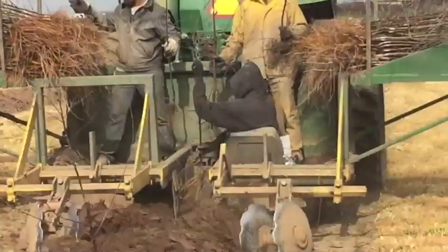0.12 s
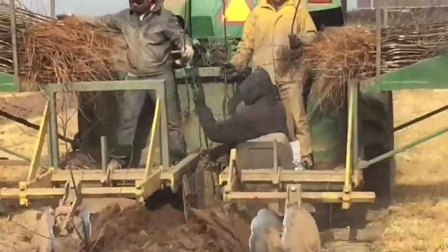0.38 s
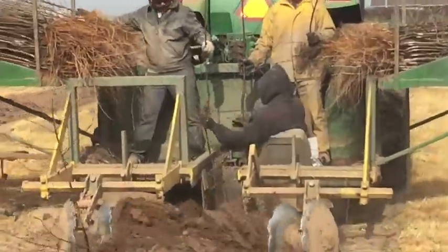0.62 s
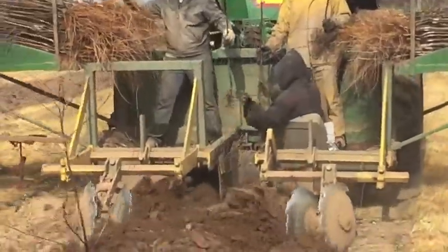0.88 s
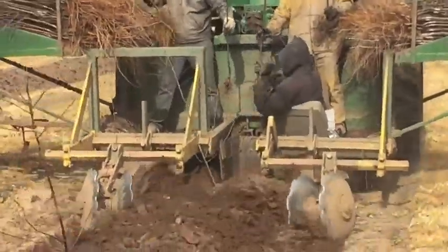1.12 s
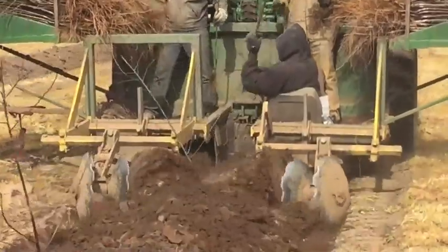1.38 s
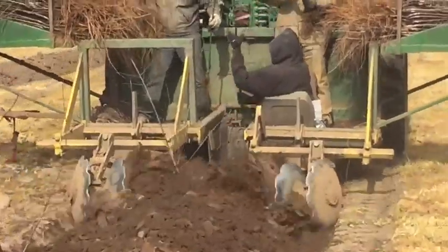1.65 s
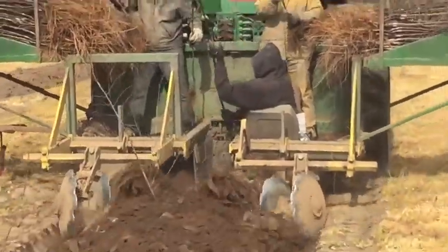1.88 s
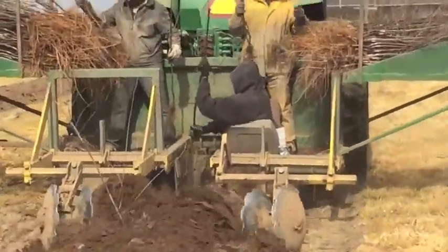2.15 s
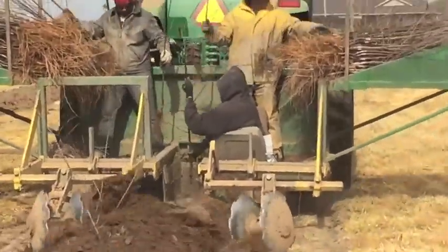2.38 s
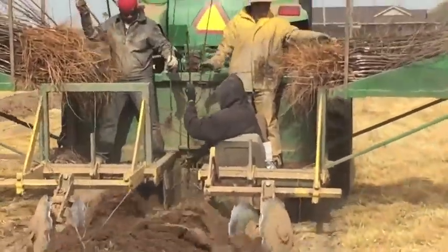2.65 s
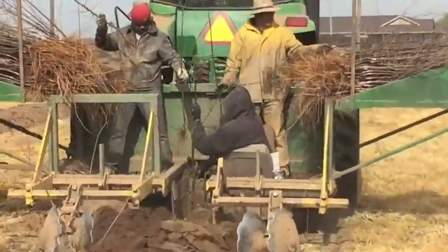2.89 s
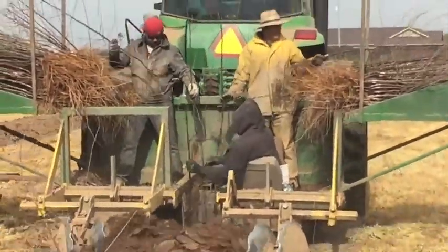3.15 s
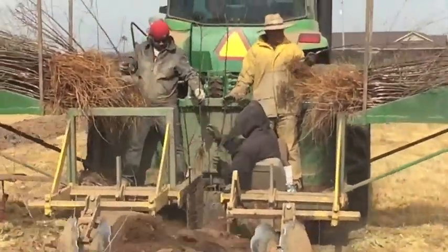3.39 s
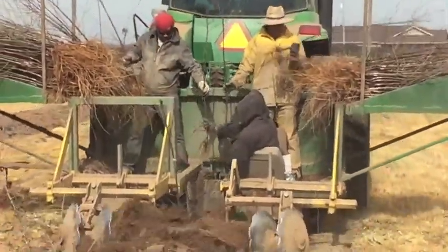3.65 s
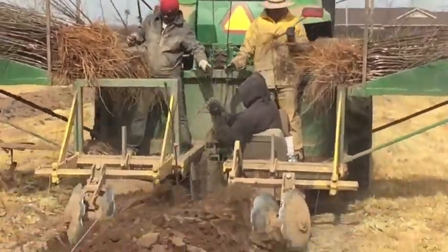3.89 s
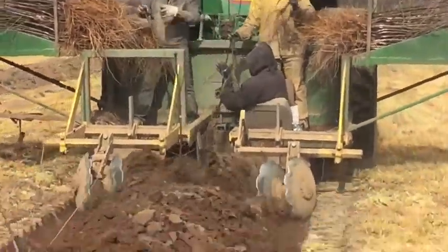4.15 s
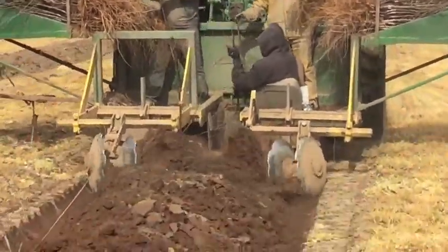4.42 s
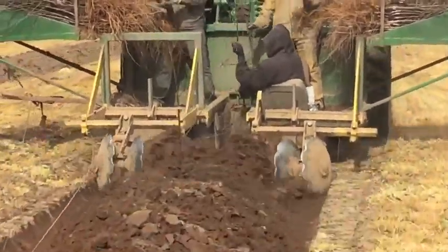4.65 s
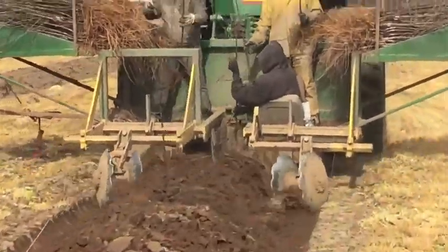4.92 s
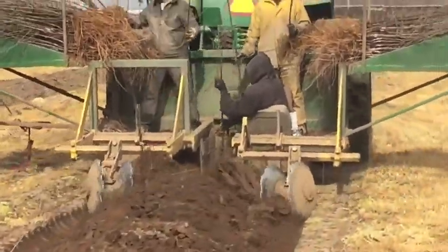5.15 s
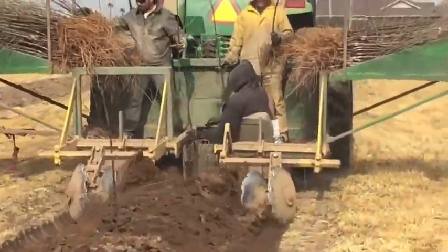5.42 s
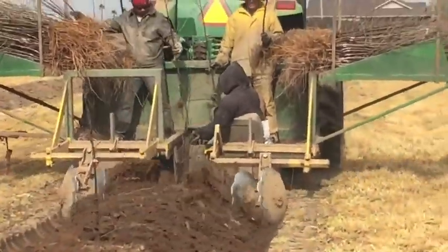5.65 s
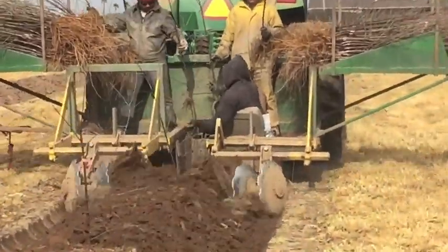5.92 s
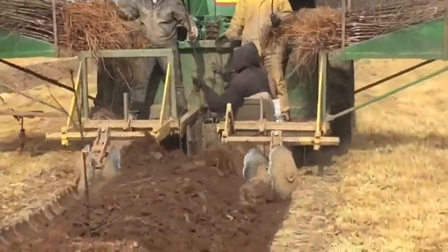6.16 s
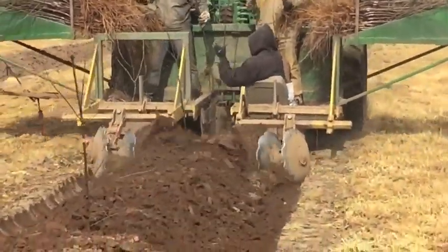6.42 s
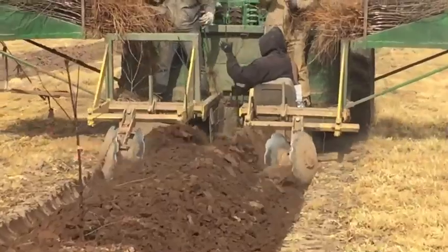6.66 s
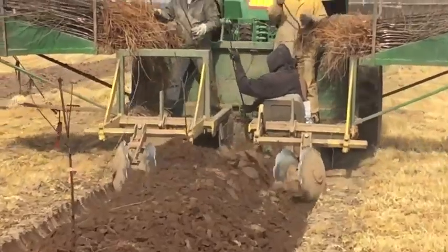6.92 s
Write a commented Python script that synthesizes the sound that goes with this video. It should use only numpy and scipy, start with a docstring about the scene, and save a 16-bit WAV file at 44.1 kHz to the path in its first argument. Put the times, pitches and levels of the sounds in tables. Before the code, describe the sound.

A large diesel tractor drones steadily outdoors, a second hum beating against it, with wind buffeting the microphone and loose steel jingling faintly.

```python
"""A six-cylinder diesel tractor hauls a planter across a field in a light wind: steady tones locked to
the firing, over a roar of coloured noise. A second, steadier hum of sine tones beats against them.
Loose steel jingles on the frame as decaying modes, and roots rustle in soft swells of hiss.
Low noise swells in gusts that buffet the microphone, with short sinking pops of air and a steady rumble."""
import sys
import numpy as np
from scipy import signal
from scipy.fft import rfft, irfft, next_fast_len
from scipy.io import wavfile
from scipy.ndimage import uniform_filter1d, map_coordinates

SR = 44100
rng = np.random.default_rng(int(sys.argv[2]) if len(sys.argv) > 2 else 0)


def to_linear_factor(level_db):
    """Convert decibel levels (scalar or array-like) to linear amplitude factors."""
    exponent = np.asarray(level_db, float) / 20
    return 10 ** exponent


def bounce(signal):
    """Save signal as a 16-bit WAV file at the path given by the first command-line argument."""
    frames = np.transpose(np.atleast_2d(signal))
    limited = np.clip(frames, -1, 1)
    pcm = np.round(limited * 32767).astype(np.int16)
    wavfile.write(sys.argv[1], SR, pcm)


N = 310905  # length [samples]

# engine speed: (time [s], firing rate [Hz])
FIRING_RATE = [(0, 105.6), (0.5, 106.4), (0.9, 105.6), (1.5, 106.7), (2.0, 105.9), (2.6, 105.9), (2.9, 104),
               (3.2, 104.4), (3.5, 102.5), (3.8, 104.1), (4.4, 104.1), (5.0, 102.9), (5.3, 103.2),
               (5.9, 103.3), (6.3, 104.8), (6.8, 104), (7.05, 102.9)]
# colour of dry scraping and rustling: (frequency [Hz], relative density [dB per Hz])
DRY_SCRAPE = [(3000, -20), (6000, -5), (10500, -5), (13000, -4), (15700, -16)]


def unit(x):
    """Scaled to rms 1."""
    return x / np.sqrt(np.mean(x ** 2) + 1e-20)


def curves(rows):
    """One value per sample for each column after the time."""
    times, *columns = np.transpose(rows)
    return [np.interp(np.arange(N) / SR, times, column) for column in columns]


def wobble(rate):
    """A smooth random curve, rate knots a second."""
    knots = rng.standard_normal(int(N * rate / SR) + 4)
    return map_coordinates(knots, [np.arange(N) * rate / SR])


def noise(spectrum, modes=()):
    """Noise of rms 1 with a (Hz, dB) colour and bell-shaped peaks or dips on top."""
    size = next_fast_len(N)
    hz = np.fft.rfftfreq(size, 1 / SR)
    knot_hz, knot_db = np.transpose(spectrum)
    level_db = np.interp(np.log(hz + 1), np.log(knot_hz), knot_db, left=-120)
    for centre, width, peak_db in modes:
        level_db = level_db + peak_db / (1 + (2 * (hz - centre) / width) ** 2)
    white = rfft(rng.standard_normal(size))
    return unit(irfft(white * to_linear_factor(level_db), size)[:N])


def patchy(x, depth_db, size):
    """Noise whose gain drifts in patches of pitch and time; long windows make faint whines come and go."""
    bins = signal.stft(x, nperseg=size)[2]
    field = uniform_filter1d(rng.standard_normal(bins.shape), size=3, axis=0)  # across pitch
    field = uniform_filter1d(field, size=12, axis=1)  # across time
    return unit(signal.istft(bins * to_linear_factor(depth_db * unit(field)), nperseg=size)[1][:N])


def add(track, s, sound):
    """Mix a short sound into the track from time s."""
    part = track[round(s * SR):][:len(sound)]
    part += sound[:len(part)]


def tones(phase, table, spread, waver_db, rate):
    """Multiples of a turning phase; higher ones start further out of step and waver more."""
    out = np.zeros(N)
    for multiple, db in table:
        start = spread * multiple * rng.standard_normal()
        level_db = db + waver_db * np.log(multiple) * wobble(rate)
        out += np.sqrt(2) * to_linear_factor(level_db) * np.cos(multiple * phase + start)  # sqrt 2: rms to peak
    return out


def engine():
    """Each four-stroke cycle holds six firings; tones and roar share its turning phase."""
    cylinders = 6
    firing_hz, = curves(FIRING_RATE)
    cycle = 2 * np.pi * np.cumsum(firing_hz) / SR / cylinders
    return engine_tones(cycle) + engine_roar(cycle, cylinders)


def engine_tones(cycle):
    """Harmonics of the engine cycle; three low odd ones swell and fade together."""
    # clean tones: (multiple of the cycle [-], level before drift and waver [dB rms])
    orders = [(3, -25.5), (4, -42), (5, -41), (6, -17), (7, -45), (9, -41), (12, -35), (13, -52), (15, -50),
              (16, -53), (18, -56), (20, -54), (21, -54), (23, -57), (25, -56), (27, -57), (29, -53),
              (30, -58), (34, -60), (35, -58), (36, -62), (42, -59), (48, -61), (54, -56), (55, -57),
              (56, -54), (58, -57), (60, -50), (63, -62), (66, -63), (72, -62), (75, -61), (78, -60),
              (84, -63), (90, -63)]
    # boost of the low odd tones: (time [s], gain [dB])
    odd_drift = [(0, -2), (3, -8), (3.8, -1.5), (6.2, 2.5), (7.05, -7)]
    odd = [row for row in orders if row[0] in (9, 15, 21)]
    rest = [row for row in orders if row[0] not in (9, 15, 21)]
    drift_db, = curves(odd_drift)
    steady = tones(cycle, rest, spread=0.047, waver_db=0.26, rate=3.11)
    return steady + to_linear_factor(drift_db) * tones(cycle, odd, spread=0.283, waver_db=1.25, rate=2.63)


def engine_roar(cycle, cylinders):
    """Body and clatter noise, resonant and swelling a little with the firing, plus plain fan hiss."""
    # loudness of the body noise: (time [s], level [dB])
    roar = [(0, -43.5), (.3, -39), (1.7, -38.5), (2.2, -39.5), (3.0, -38.5), (3.5, -37), (5.0, -38.5),
            (5.8, -38), (6.6, -37), (7.05, -35)]
    # colours of the three noises: (frequency [Hz], relative density [dB per Hz])
    body_colour = [(60, -39), (150, -0.5), (270, -3.5), (450, -9.5), (780, -10.5), (1150, -13), (1700, -31),
                   (3000, -52)]
    clatter_colour = [(600, -24), (1100, -3), (1500, 0.5), (2200, -2), (3000, -5), (4000, -9.5),
                      (5000, -10.5), (8000, -40)]
    hiss_colour = [(2000, -8), (4000, -6), (5500, -0.5), (7300, -6), (10200, -10.5), (10500, -13.5),
                   (13000, -15), (15700, -20)]
    # block and bonnet resonances, the last one a dip: (centre [Hz], width [Hz], height [dB])
    block = [(367, 20, 5), (530, 130, 5.5), (688, 7.6, 6.5), (905, 125, 4.5), (997, 51, 5.5), (1343, 46, 8),
             (1430, 49, 3.5), (1593, 16, 1), (1783, 21, 6.5), (1926, 88, 6), (2510, 380, 5.5),
             (3296, 240, 4.5), (4900, 210, -21)]
    body_db, = curves(roar)
    swing_db = body_db - body_db.mean()
    # clatter and hiss follow only a share of the body's swings
    clatter_db = -40 + 0.59 * swing_db + 0.27 * wobble(4.7)
    hiss_db = -51.5 + 0.35 * swing_db
    body = to_linear_factor(body_db + 0.2 * wobble(2.7)) * patchy(noise(body_colour, block), depth_db=1.65, size=2048)
    clatter = to_linear_factor(clatter_db) * patchy(noise(clatter_colour, block), depth_db=2.0, size=1024)
    hiss = to_linear_factor(hiss_db) * patchy(noise(hiss_colour), depth_db=1.9, size=512)
    # swells at every firing, every second firing and every cycle
    knock = 1 + 0.029 * np.cos(cylinders * cycle) + 0.027 * np.cos(cylinders / 2 * cycle)
    knock += 0.022 * np.cos(cycle)
    return knock * (body + clatter) + hiss


def hum():
    """A second machine turns at its own nearly even speed; its overtones swell and fade."""
    # harmonics: (multiple of the hum pitch [-], level before swells [dB rms])
    harmonics = [(1, -31), (2, -42.5), (4, -49), (5, -77), (7, -58.5), (9, -60)]
    # swell of the overtones: (time [s], gain [dB])
    overtone_swell = [(0, -3.5), (.9, 1.5), (1.9, 4), (2.7, 1.5), (3.3, 0.5), (4.2, 3), (5, -1.5),
                      (5.8, -2), (6.4, -1), (7.05, -1.5)]
    pitch_hz = 95.27 + 0.278 * wobble(2.5)
    phase = 2 * np.pi * np.cumsum(pitch_hz) / SR
    upper_db, = curves(overtone_swell)
    base = tones(phase, harmonics[:1], spread=2.7, waver_db=0, rate=4)
    upper = to_linear_factor(upper_db) * tones(phase, harmonics[1:], spread=3.02, waver_db=0.36, rate=3.9)
    return to_linear_factor(0.68 * wobble(3.02)) * (base + upper)


def shakes():
    """Runs of evenly spaced shakes near every tenth firing, plus faint strays: (s, dB, brightness dB)."""
    # runs: (first shake [s], last shake [s], first level [dB], last level [dB], brightness [dB])
    run_table = [(0.0925, .4728, -54, -52, 11), (.0613, .0613, -61, -61, 6), (0.1615, .5394, -57, -62, -8),
                 (3.0754, 3.1682, -60, -52, 0), (3.263, 3.3593, -52.5, -50, -3),
                 (3.294, 3.4805, -49.5, -52, 3), (3.5504, 3.6474, -58, -59, -1),
                 (3.6737, 3.7714, -55, -59, 3), (3.9395, 3.9395, -58, -55, 0),
                 (4.1325, 4.1325, -53, -59, 14), (4.2044, 4.2994, -60, -53, -4),
                 (4.3625, 4.6548, -59, -54, 2), (4.722, 4.9193, -56, -57, 2), (4.9894, 5.0799, -58, -55, 4),
                 (5.267, 5.2669, -52, -52, 4), (5.3428, 5.3428, -56, -56, 4), (5.5338, 5.5338, -53, -53, 9),
                 (5.6032, 5.7947, -52, -58, -1), (6.0644, 6.0644, -60, -60, -2),
                 (6.2226, 6.2226, -52, -53, 6), (6.2901, 6.2901, -55, -57, 2),
                 (6.4424, 6.4415, -57, -58, 9), (6.5086, 6.5999, -49, -56, -2),
                 (6.6696, 6.9564, -54, -54, 6)]
    gap_s = 10 / np.mean(FIRING_RATE, axis=0)[1]
    hits = []
    for first, last, first_db, last_db, bright_db in run_table:
        count = round((last - first) / gap_s) + 1
        for s, db in np.linspace((first, first_db), (last, last_db), count):
            hits.append((s, db, bright_db))
    strays = [(s, -63, 3) for s in rng.uniform(3.1, N / SR, 24)]
    return hits + strays


def jingles():
    """Each shake is a chatter of contacts that scrape and ring the same steel modes at new strengths."""
    # modes of the loose steel: (frequency [Hz], relative level [dB], time to fall 60 dB [s])
    steel = [(5610, -1, .13), (6920, -1.5, .17), (7420, -6, .15), (7710, -1, .07), (8300, 0, .06),
             (8820, -3, .09), (9220, -7, .11), (9760, -2, .06), (9960, -3, .09), (11080, 1, .025),
             (11930, 1, .08), (12180, -3, .06), (12500, -4, .07), (13200, -7, .03), (13590, -3, .06),
             (14030, -3, .05)]
    contacts, spacing_s = 7, .005
    out, t = np.zeros(N), np.arange(SR // 8) / SR
    hz, level_db, t60 = np.transpose(steel)[:, :, None]
    high = np.clip((hz - 8500) / 3500, 0, 1)  # which modes brightness lifts
    decay = to_linear_factor(-60 * t / t60) * (1 - np.exp(-t / .002))  # soft 2 ms onset
    scrape = noise(DRY_SCRAPE)
    for s, db, bright_db in shakes():
        shake_db = 1.5 * rng.standard_normal()  # one offset for all modes
        colour_db = level_db + bright_db * (high - .5) + shake_db + rng.normal(0, 2, hz.shape)
        for late in spacing_s * (np.arange(contacts) + rng.uniform(-.5, .5, contacts)):
            weaken, turn = rng.uniform(0, 1, (2, len(hz), 1))
            waves = np.sin(2 * np.pi * (hz * t + turn))
            ring = (to_linear_factor(colour_db - 10 * weaken) * decay * waves).sum(0)
            tick = to_linear_factor(3 - 60 * t / .02) * scrape[rng.integers(N - len(t)):][:len(t)]
            swell_db = -330 * abs(late - .006)  # the chatter builds up, then dies away
            add(out, max(s + late - .005, 0), to_linear_factor(db + swell_db) * (ring + tick))
    return out


def rustles():
    """Soft swells of grainy hiss as bundles of roots are pulled and soil slides."""
    # rustles: (start [s], length [s], level [dB])
    strokes = [(1.2, .03, -56), (3.436, 0.11, -59), (3.758, 0.19, -54), (4.118, 0.25, -54.5),
               (5.07, 0.2, -56), (5.682, .07, -65), (6.26, 0.11, -59), (6.55, .12, -63)]
    grain = unit(to_linear_factor(1.5 * wobble(90)) * noise(DRY_SCRAPE))
    t, swell = np.arange(N) / SR, np.zeros(N)
    for s, length, db in strokes:
        progress = np.clip((t - s) / length, 0, 1)
        swell += to_linear_factor(db) * np.sqrt(np.abs(np.sin(np.pi * progress)))
    return swell * grain


def wind():
    """Lumpy low noise buffets the microphone and swells in bell-shaped gusts."""
    # buffeting between the gusts: (time [s], level [dB])
    buffet_level = [(0, -47), (.2, -23.5), (.6, -27.5), (1.6, -26), (2.0, -41), (2.6, -25), (3.1, -32),
                    (3.7, -31), (4.1, -42), (4.6, -27.5), (5.1, -29), (5.9, -34.5), (6.5, -32.5),
                    (7.05, -32.5)]
    # strongest gusts: (time [s], added level at the peak [dB])
    gust_table = [(.08, -23), (.23, -21), (.36, -27), (.84, -21), (.99, -23.5), (1.22, -27), (1.35, -25),
                  (1.63, -24.5), (2.49, -28), (3.37, -25.5), (3.7, -22), (4.36, -22.5), (4.81, -25),
                  (5.85, -28.5), (6.03, -28), (6.26, -21), (6.77, -40), (7.03, -26)]
    # buffet colour: (frequency [Hz], relative density [dB per Hz])
    buffet_colour = [(15, -62), (30, -13), (42, -2), (60, 2.5), (100, -2), (150, -10), (250, -16),
                     (400, -39), (800, -76)]
    steady_db, = curves(buffet_level)
    t = np.arange(N) / SR
    gust_s = 0.029  # from the peak to 1/e of it
    gusts = sum(to_linear_factor(db) * np.exp(-((t - at) / gust_s) ** 2) for at, db in gust_table)
    buffet = unit(to_linear_factor(1.15 * wobble(20)) * noise(buffet_colour))
    return (to_linear_factor(steady_db + 2 * wobble(9)) + gusts) * buffet


def air_pops():
    """Air pops on the capsule: a few cycles of sinking pitch, made crisp by their octave."""
    # pops: (centre [s], level of the fundamental [dB peak], pitch at the centre [Hz])
    pop_table = [(0.074, -29, 203), (0.22, -25.5, 457), (.521, -26, 254), (.876, -13.5, 410),
                 (1.024, -26.5, 219), (1.139, -27.5, 302), (1.492, -27, 220), (1.546, -16.5, 182),
                 (2.768, -23, 255), (3.622, -28, 304), (4.369, -24, 220), (4.517, -26, 420),
                 (4.846, -26, 230), (4.888, -28, 294)]
    out, t = np.zeros(N), np.arange(-SR // 50, SR // 50) / SR
    for at, db, hz in pop_table:
        turns = hz * t
        angle = 2 * np.pi * turns * (1 - .1 * turns)  # loses a fifth of its pitch per turn
        swell = np.exp(-(2 * turns / 2.5) ** 2)  # 2.5 cycles between the 1/e points
        wave = np.cos(angle) + to_linear_factor(-12) * np.cos(2 * angle)
        add(out, at + t[0], -to_linear_factor(db) * swell * wave)
    return out


def rumble():
    """Steady deep noise under everything."""
    # rumble colour: (frequency [Hz], relative density [dB per Hz])
    rumble_colour = [(10, 6.5), (25, 2.5), (40, -1), (80, -32), (300, -120)]
    return to_linear_factor(-49) * noise(rumble_colour)


def scene():
    """Everything reaches one microphone in the open, between two 4 ms fades."""
    edge = np.minimum(np.arange(N), np.arange(N)[::-1]) / SR
    fade = np.clip(edge / .004, 0, 1)
    mix = engine() + hum() + jingles() + rustles() + wind() + air_pops() + rumble()
    return (fade * mix)[None]


def band_limit(x):
    """A steep low-pass at the top of the band."""
    return signal.sosfilt(signal.butter(12, 15780, fs=SR, output="sos"), x)


def record(dry):
    """The microphone cuts the deepest bass, below 36 Hz."""
    low_cut = signal.butter(3, 36, "highpass", fs=SR, output="sos")
    mix = signal.sosfilt(low_cut, dry)
    return band_limit(mix)


dry = scene()
out = record(dry)
bounce(out)
```